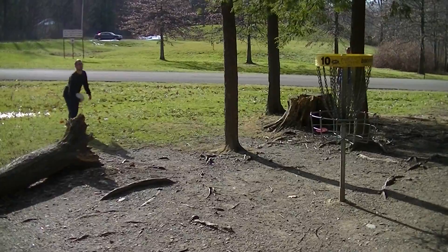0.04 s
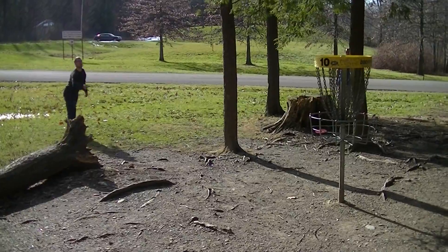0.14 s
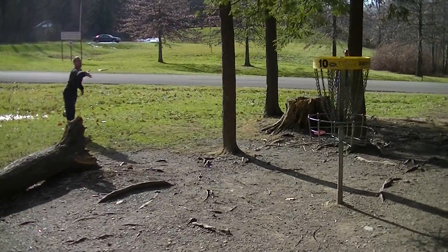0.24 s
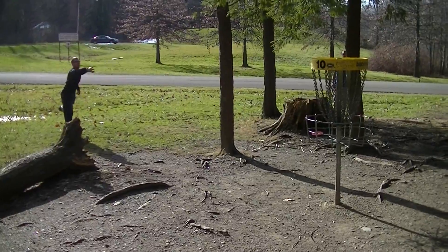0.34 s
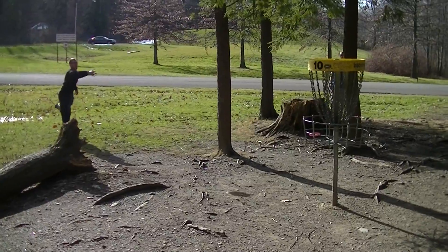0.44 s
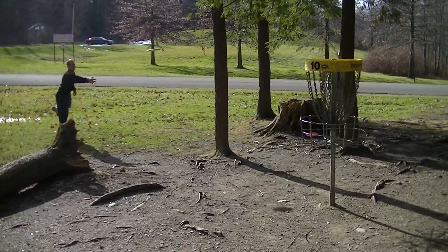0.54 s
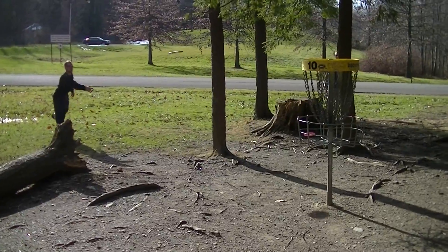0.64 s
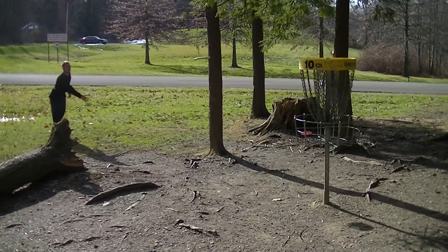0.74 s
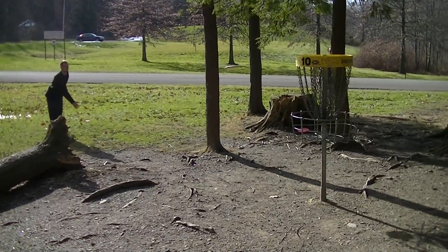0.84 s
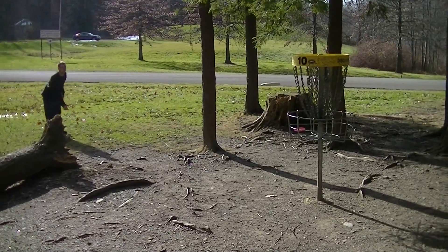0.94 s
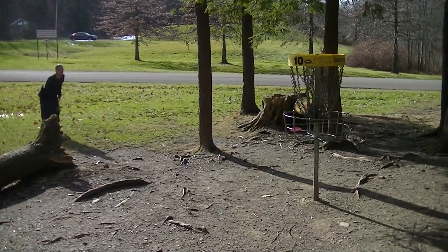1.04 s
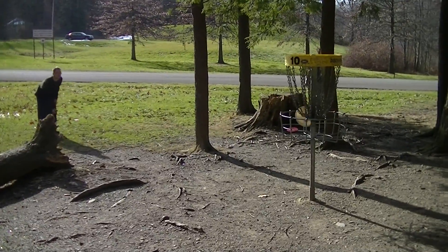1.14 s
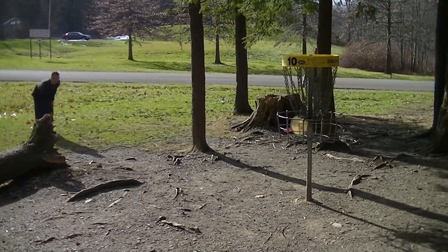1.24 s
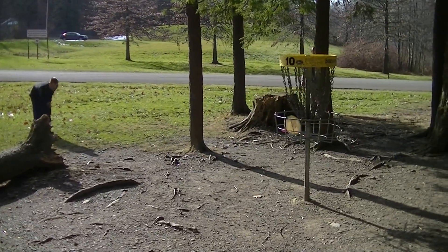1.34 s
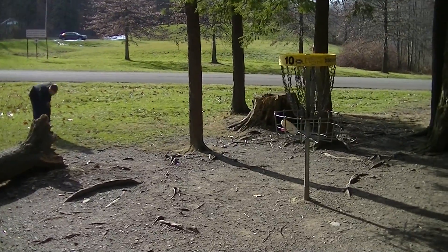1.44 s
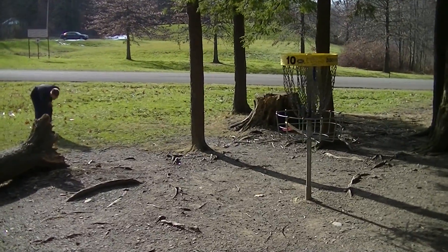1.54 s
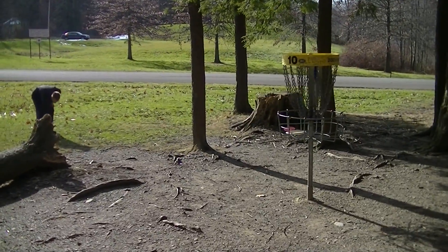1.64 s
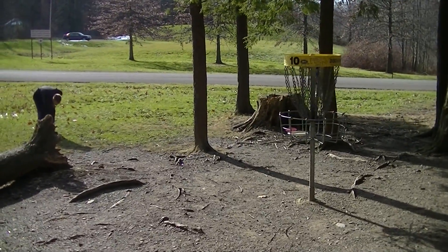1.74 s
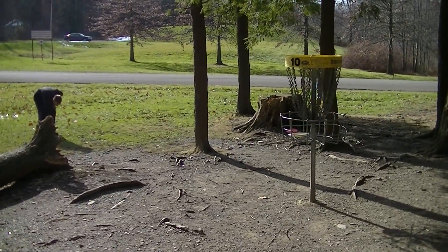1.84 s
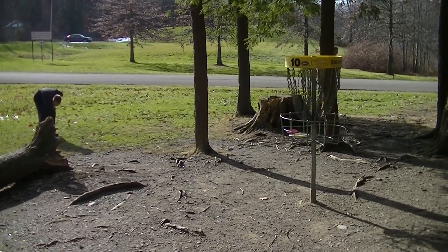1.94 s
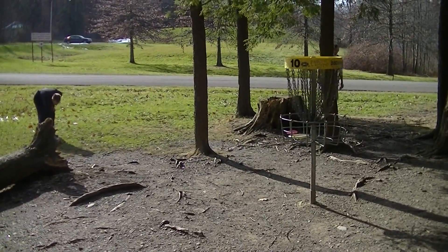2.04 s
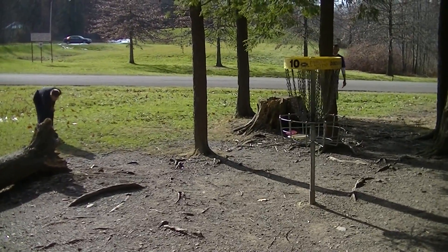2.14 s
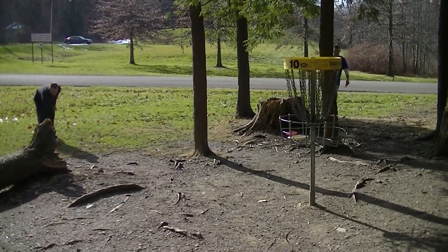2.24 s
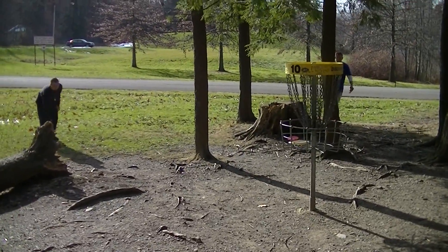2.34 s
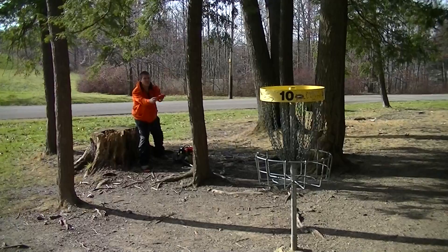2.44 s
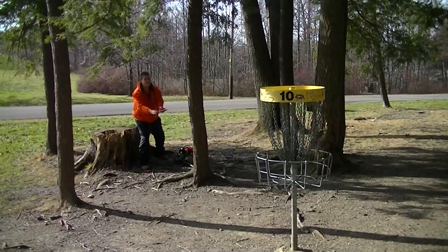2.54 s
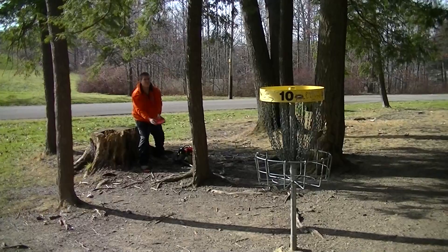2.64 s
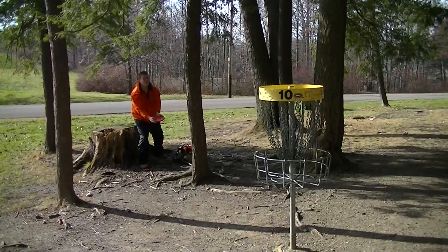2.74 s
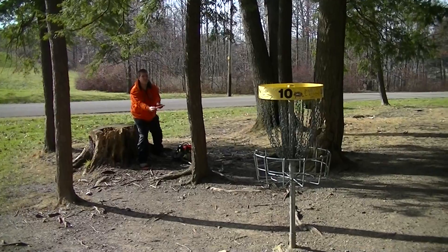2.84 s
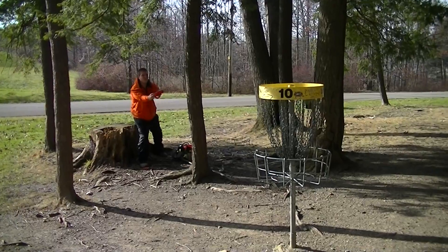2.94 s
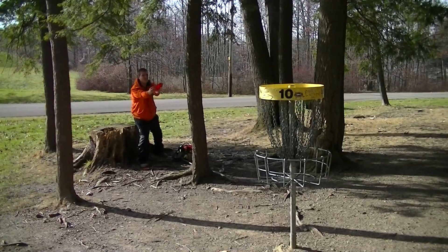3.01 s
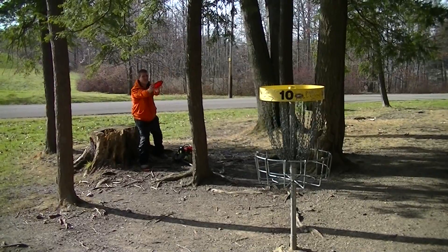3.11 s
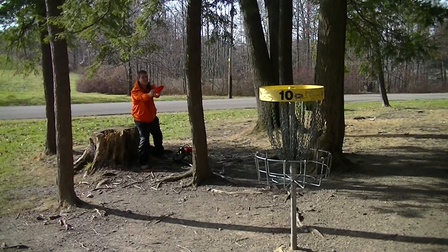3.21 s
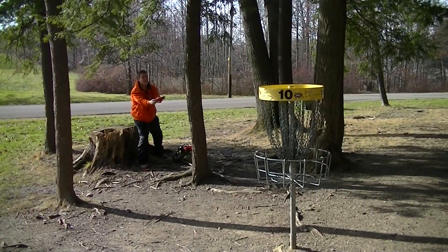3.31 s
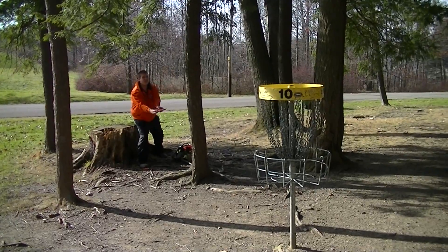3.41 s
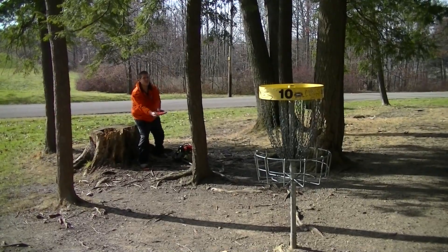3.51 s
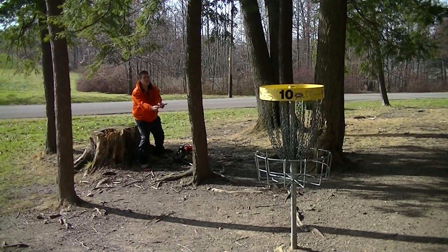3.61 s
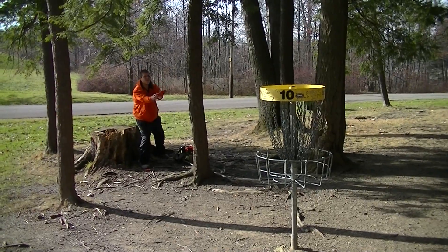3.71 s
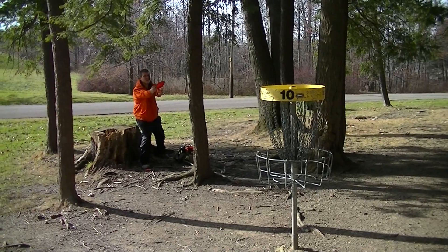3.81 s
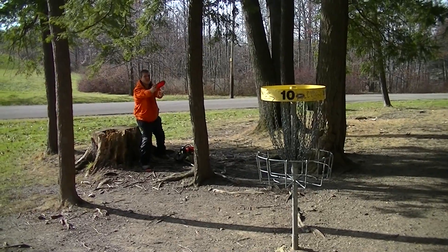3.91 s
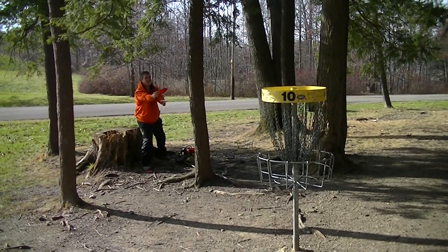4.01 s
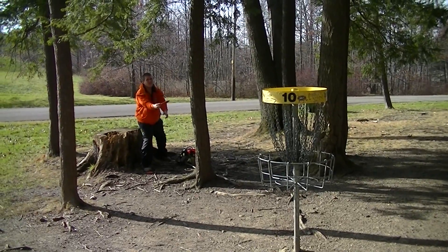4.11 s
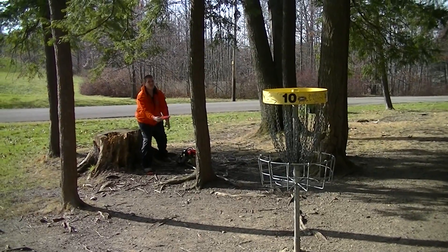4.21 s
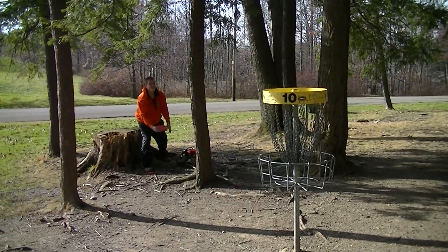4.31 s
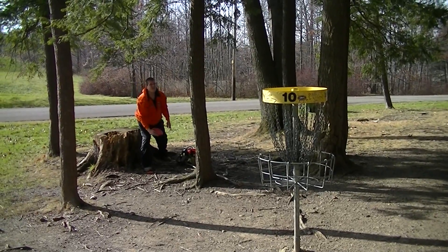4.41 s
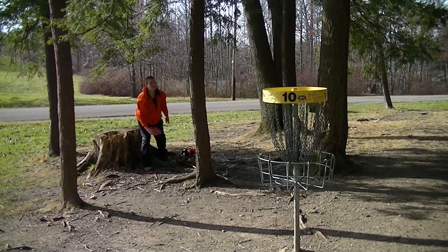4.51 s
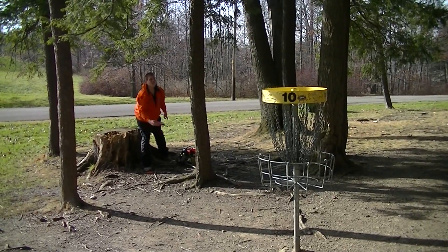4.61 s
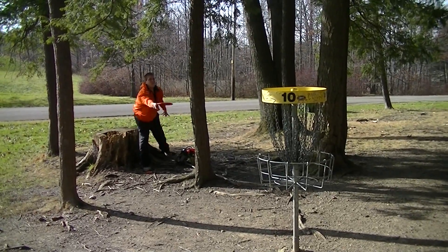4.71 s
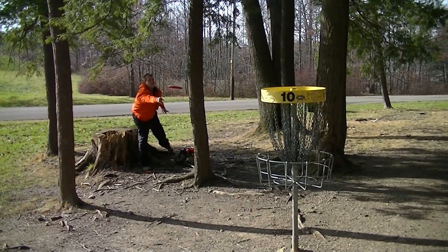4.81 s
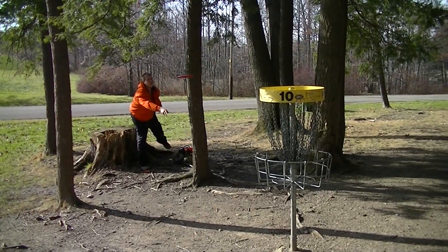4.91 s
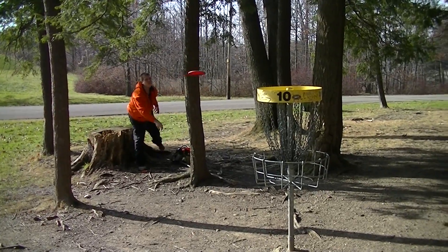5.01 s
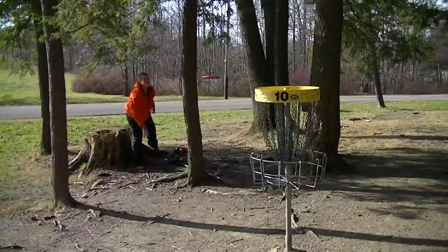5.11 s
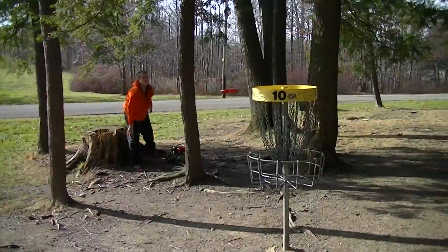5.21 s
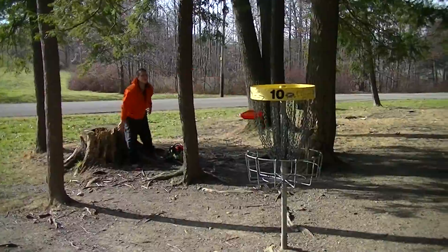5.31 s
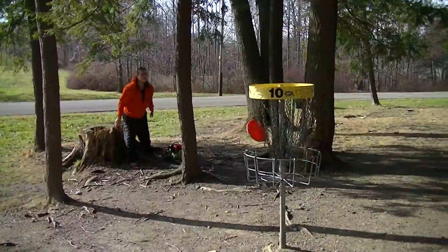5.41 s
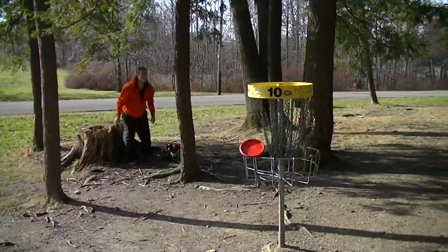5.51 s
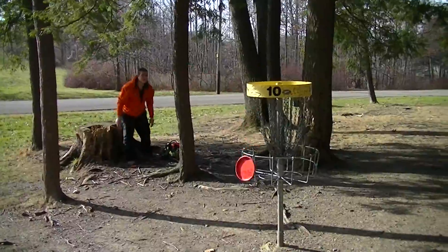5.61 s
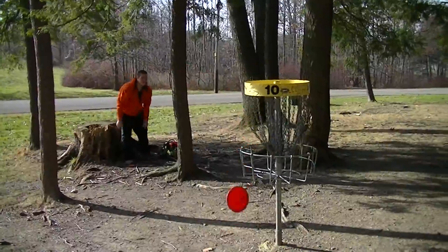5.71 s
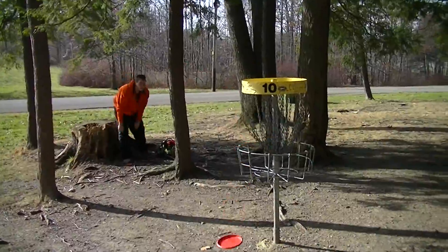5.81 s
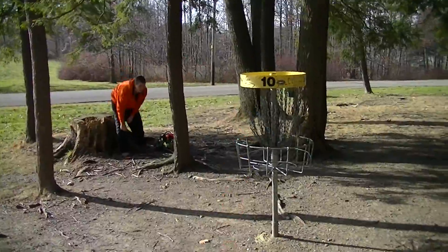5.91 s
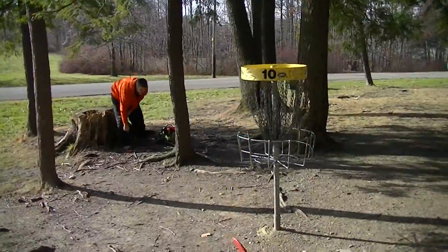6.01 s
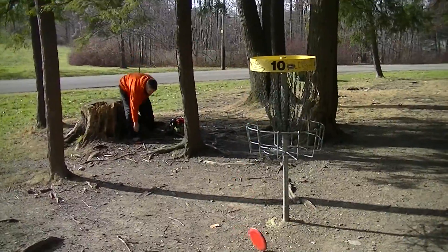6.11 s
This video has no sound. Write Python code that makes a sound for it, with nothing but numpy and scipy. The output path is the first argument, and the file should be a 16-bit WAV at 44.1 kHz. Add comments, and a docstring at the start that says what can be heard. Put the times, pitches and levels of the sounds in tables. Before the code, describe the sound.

Two disc golf throws hit the basket outdoors, each a plastic knock and a clash of steel chains that jingle and fade.

```python
"""Disc golf chains in a park

A thrown disc crashes into the chains of a basket; the sound cuts off, and a second throw follows.
Steel links jingle near 12 kHz and clatter, the hoop that gathers them rings near 4 kHz, the plastic
disc scrapes and knocks, and the tray wires ring. Trees echo it all. Around it are far road noise,
light wind on the microphone, rustling clothes, a few dry snaps and a faint trill."""
import sys
import numpy as np
from scipy import signal
from scipy.fft import rfft, irfft, next_fast_len
from scipy.io import wavfile
from scipy.ndimage import uniform_filter1d

SR = 44100
rng = np.random.default_rng(int(sys.argv[2]) if len(sys.argv) > 2 else 0)


def inscribe(sig):
    """Save sig as 16-bit PCM at rate SR to the path in sys.argv[1].

    A 1-D sig is mono; a 2-D sig holds one channel per row.
    Samples are clipped to [-1, 1] before scaling.
    """
    pcm = np.round(np.clip(np.atleast_2d(sig).T, -1, 1) * 32767)
    wavfile.write(sys.argv[1], SR, pcm.astype(np.int16))


N = 271259
T = np.arange(N) / SR
CUT_S, DIP_S = 2.406, .005  # the first throw stops here, and the level dips this long

# In all tables, levels are relative and fade_s is the time to die away by 60 dB.
# Chains slapping together: start_s, tick_db, ring_db
SLAPS = [(1.0076, 0.5, -13), (1.0548, -2, -11), (1.076, -17, -19), (1.0944, -27, -16), (1.1328, -18, -15),
         (1.1787, -15, -13), (1.243, -17, -7), (1.345, -18, -15), (1.3648, -32, -3.5), (1.4127, -28, -7),
         (1.4562, -14, -6), (1.6382, -21, -20), (1.682, -28, -11), (1.7454, -25, -17), (1.7846, -17.5, -20),
         (1.8102, -16.5, -24), (1.852, -20.5, -10), (1.8855, -33, -10), (1.922, -39, -7),
         (1.9334, -38, -18.5), (2.0063, -27, -25), (2.0836, -33, -28), (2.141, -40, -23),
         (2.3754, -44, -25), (5.3011, 0.5, -4), (5.3194, -4, -2), (5.3676, -6.5, -14), (5.3939, -9, -7),
         (5.4115, -23, -11), (5.4414, -28, -11), (5.456, -11.5, -2.5), (5.5717, -13, -5),
         (5.5947, -12, -27), (5.6795, -28, -15), (5.7038, -23, -17), (5.7169, -15, -11),
         (5.7458, -13, -4.5), (5.8046, -20, -8), (5.8344, -32, -15), (5.879, -16.5, -23), (5.949, -19, -19),
         (5.9693, -44, -6), (6.0437, -42, -14), (6.092, -39, -26), (6.11, -40, -22), (6.124, -24.5, -18)]


def gain_of(db):
    """Turns decibels into a multiplier."""
    return 10 ** (np.asarray(db) / 20)


def evened(x):
    """Scales x to an average (rms) level of 1."""
    return x / np.sqrt(np.mean(x ** 2) + 1e-20)


def curve_at(points, hz):
    """Reads between the rows of a (pitch_hz, value) table."""
    pitches, values = np.transpose(points)
    return np.interp(np.log(hz + 1), np.log(pitches + 1), values)


def coloured(x, spectrum):
    """Filters x by a (pitch_hz, level_db) table."""
    size = next_fast_len(len(x))
    gains = gain_of(curve_at(spectrum, np.fft.rfftfreq(size, 1 / SR)))
    return irfft(rfft(x, size) * gains, size)[:len(x)]


def evened_in_band(x, low_hz, high_hz):
    """Scales all of x so that one band has an average level of 1."""
    band = signal.sosfilt(signal.butter(4, [low_hz, high_hz], "band", fs=SR, output="sos"), x)
    return x / np.sqrt(np.mean(band ** 2))


def ring(x, hz, fade_s):
    """Each click in x starts a dying tone."""
    decay, turn = 1000 ** (-1 / (max(fade_s, 1e-3) * SR)), 2 * np.pi * hz / SR
    return signal.lfilter([0, np.sin(turn)], [1, -2 * decay * np.cos(turn), decay * decay], x)


def clicks(per_s, spread_db):
    """Random contacts of either sign, mostly small."""
    when, size, sign = rng.random((3, N))
    return (when < per_s / SR) * gain_of(-spread_db * np.log(size + .01)) * np.sign(sign - .5)


def blows(rows, shape, column):
    """Places a loudness shape at each row's start, at the level in the given column."""
    out = np.zeros(N)
    for row in rows:
        out[round(row[0] * SR)] = gain_of(row[column])
    return signal.oaconvolve(out, shape)[:N]


def bursts(rows, rise_s=.007, column=1):
    """Loudness of events that rise fast and fade; those begun before CUT_S stop there."""
    out = np.zeros(N)
    for row in rows:
        start, stop = round(row[0] * SR), round(CUT_S * SR) if row[0] < CUT_S else N
        t = T[:stop - start]
        level_db = row[column] - 60 * np.maximum(t - rise_s, 0) / row[-1]
        out[start:stop] += np.minimum(t / rise_s, 1) * gain_of(level_db)
    return out


def smeared(x, fade_s):
    """Spreads x into a short, fading trail of randomly delayed copies."""
    t = T[:SR // 2]
    trail = rng.choice([-1., 1.], len(t)) * (rng.random(len(t)) < .05)
    trail *= gain_of(-60 * t / fade_s) * (t > .002)
    return signal.fftconvolve(x, trail / np.linalg.norm(trail))[:N]


def road():
    """Far traffic: low noise with drifting louder patches, nearly alike left and right."""
    # Road tone, one list for each throw: pitch_hz, level_db
    tones = [
        [(41, -36), (70, 0.5), (129, -5), (208, 1), (238, -1.5), (286, -11.5), (401, -11.5), (603, -12),
         (723, -5), (908, -9.5), (1560, -15), (2580, -23), (7140, -30.5), (14400, -40.5), (15800, -53)],
        [(41, -33), (70, -9.5), (155, -1), (186, -10.5), (222, 1.5), (342, -11), (383, -5), (420, -15.5),
         (449, -13.5), (707, -5), (1040, -10), (1400, -9), (2050, -16.5), (8570, -29), (15800, -40)],
    ]
    # Road loudness, one list for each throw: time_s, level_db
    levels = [
        [(0.0, -43.5), (1.5, -44), (2.4, -42.5)],
        [(2.42, -48), (4.1, -48), (5.4, -46), (6.15, -43.5)],
    ]
    # How alike left and right are: pitch_hz, likeness (1 = the same)
    likeness = [(60, 0.87), (150, 1), (380, 0.96), (950, 0.99), (2380, 0.94), (5980, 0.9), (15000, 1)]
    frames, hz = N // 256 + 5, np.fft.rfftfreq(1024, 1 / SR)
    a, b, c, d, patches = rng.standard_normal((frames, 513, 5)).T
    patches = evened(uniform_filter1d(uniform_filter1d(patches, 12, 0), 14, 1))
    same = np.clip(curve_at(likeness, hz), -1, 1)[:, None]
    left = a + 1j * b
    right = same * left + np.sqrt(1 - same ** 2) * (c + 1j * d)
    noise = np.array([left, right]) * gain_of(0.73 * patches)
    out, first = 0, T < CUT_S + DIP_S / 2
    for tone, rows, heard in zip(tones, levels, (first, ~first)):
        spectra = noise * gain_of(curve_at(tone, hz))[:, None]
        wash = signal.istft(spectra, nperseg=1024, noverlap=768)[1][:, :N]
        out += heard * gain_of(np.interp(T, *np.transpose(rows))) * evened_in_band(wash, 78, 400)
    return out


def wind():
    """Puffs of air rumble on the microphone, partly different left and right."""
    # Puffs of wind: middle_s, level_db, half_length_s
    gusts = [(.17, -43, .08), (1.75, -50, 0.3), (2.24, -46, 0.071), (2.45, -58, .08), (3.03, -51.5, .1),
             (3.58, -46.5, .09), (4.02, -54, 0.095), (4.559, -49.5, .06), (4.92, -42, .08)]
    lull_db, tone = -69, [(8, -19), (25, 0), (55, 5), (90, -0.5), (200, -47.5)]
    a, b = (coloured(rng.standard_normal(N), tone) for _ in range(2))
    puffs = sum(gain_of(db) * np.exp(-((T - s) / half_s) ** 2) for s, db, half_s in gusts)
    return (gain_of(lull_db) + puffs) * evened(np.array([a + 0.86 * b, a - 0.29 * b]))


def clothes():
    """The thrower's clothes give a soft hiss of fine grains."""
    # Rustles of cloth: start_s, level_db, fade_s
    rustles = [(.38, -46.5, .7), (.6, -60, .5), (.9, -53, .25)]
    tone = [(700, -21), (2000, 1), (5000, -1.5), (11000, -10.5), (14000, -29.5)]
    cloth = coloured(clicks(per_s=10000, spread_db=4.3), tone)
    return bursts(rustles, rise_s=.045) * evened_in_band(cloth, 2500, 11000)


def chain_jingle(count=14):
    """Links, each tuned a little apart, are tapped as they swing and shaken at each slap."""
    # A link's tones in low, middle and high groups: pitch_hz, spread_hz, level_db, fade_s
    groups = [
        [(9270, 1500, -11, 0.0055), (9900, 150, -24, 0.06), (11754, 80, 0, 0.13)],
        [(12130, 90, -13, .08), (12440, 90, -2, 0.17), (12740, 100, -2, 0.15)],
        [(13700, 290, -5.5, 0.11), (13500, 130, -3, .1), (14300, 120, -18, .08)],
    ]
    # Chain bundles swinging into each other: start_s, low_group_db, middle_group_db, fade_s
    swings = [(1.003, -22, -15, 0.65), (1.038, -17.5, -20, 1.13), (1.12, -19, -33, 0.34),
              (1.238, -21, -33, 0.12), (1.338, -41, -23, .2), (1.355, -21.5, -27, 0.47),
              (1.47, -24, -24, 0.53), (1.585, -29, -34, 2.6), (1.73, -31, -21.5, 0.15),
              (1.845, -24, -32, 0.49), (2.08, -32.5, -40, 1.04), (2.338, -46, -39, .06),
              (2.378, -32.5, -32.5, .15), (5.298, -23, -18.5, .6), (5.358, -9, -15, 0.17),
              (5.385, -21, -14, 0.11), (5.408, -15, -15.5, 1.1), (5.63, -40, -38, 2.5),
              (5.824, -34, -9.5, 0.086), (5.88, -47, -31, 0.097), (5.952, -21, -23, 0.43)]
    taps, which_link = clicks(per_s=380, spread_db=3.1), rng.integers(0, count, N)
    slap_shape = T[:2000] / 0.0029 * gain_of(-60 * T[:2000] / 0.023)
    shakes = blows(SLAPS, slap_shape, column=2) * rng.standard_normal(N)
    low, middle = (bursts(swings, rise_s=.0092, column=k) for k in (1, 2))
    high = gain_of(-9) * middle
    out = np.zeros(N)
    # Other links face the microphone on each throw.
    for throw in (slice(SR * 7 // 8, SR * 5 // 2), slice(SR * 5, N)):
        for tones, level, slap_db in zip(groups, (low, middle, high), (-24, -28, -36)):
            jingle, struck = 0, 0
            for hz, spread_hz, db, fade_s in tones:
                for k, offset in enumerate(rng.uniform(-1.61, 1.64, count)):
                    mine, link_hz = which_link[throw] == k, hz + spread_hz * offset
                    jingle += gain_of(db) * ring(taps[throw] * mine, link_hz, fade_s)
                    struck += gain_of(db) * ring(shakes[throw] * mine, link_hz, 0.26 * fade_s)
            out[throw] += level[throw] * evened(jingle) + gain_of(slap_db) * struck
    return out


def chain_clatter(count=16):
    """Steel hits steel: a dense patter, scattered short pings and a tick at each slap."""
    # Tone of steel contacts: pitch_hz, level_db
    tone = [(2120, -24.5), (3600, -20), (4010, -21), (4240, -13), (5090, -11), (5850, -11.5), (8870, -13.5),
            (11000, -13.5), (14300, -44.5), (22000, -120)]
    # Flurries of contacts: start_s, level_db, fade_s
    rattles = [(1.003, -15, 0.27), (1.09, -30.5, 1.46), (1.452, -32.5, 0.3), (1.632, -46, 0.4),
               (1.74, -57, 0.13), (1.778, -41, 0.31), (2.005, -43, 0.079), (2.08, -52, 1.1),
               (5.3, -15, .22), (5.363, -33.5, 1.5), (5.57, -35.5, .4), (5.741, -29, 0.37),
               (5.874, -38, 0.13), (5.945, -54, 0.49)]
    patter = evened_in_band(coloured(clicks(per_s=1800, spread_db=2.36), tone), 5000, 9500)
    taps, which_ping = clicks(per_s=350, spread_db=4.5), rng.integers(0, count, N)
    pitches_hz = np.linspace(5200, 11200, count)
    pings = evened(sum(ring(taps * (which_ping == k), hz, .012) for k, hz in enumerate(pitches_hz)))
    hiss = evened_in_band(coloured(rng.standard_normal(N), tone), 5000, 12000)
    ticks = blows(SLAPS, gain_of(-60 * T[:3000] / 0.044), column=1) * hiss
    return bursts(rattles) * (patter + gain_of(-5.5) * pings) + gain_of(-11.5) * ticks


def disc_scrape():
    """Plastic drags along the chains in thousands of tiny clicks."""
    # Drags of the disc: start_s, level_db, fade_s
    drags = [(1.003, -19.5, 0.18), (1.048, -20, 0.044), (1.13, -35, 0.88), (1.205, -30, 0.42),
             (1.41, -33.5, .6), (1.455, -45, 0.27), (1.632, -38, 0.14), (1.7, -45.5, 1.17),
             (5.3, -17.5, 0.31), (5.34, -21.5, 0.1), (5.39, -42, 1.5), (5.505, -35, 0.25),
             (5.561, -35.5, 0.52), (5.745, -45, .5), (5.868, -33.5, 0.15), (5.897, -45, 0.11),
             (5.943, -51, 1.4)]
    # Tone of the scraping: pitch_hz, level_db
    tone = [(180, -40), (300, -11.5), (443, -12.5), (714, -6.5), (1230, -4.5), (1980, 0), (2430, -5.5),
            (4000, -9.5), (5200, -50.5), (8800, -120)]
    grains = coloured(clicks(per_s=4000, spread_db=2.7), tone)
    return bursts(drags) * evened_in_band(grains, 600, 3600)


def disc_knocks():
    """The disc hits steel or ground: a crack, then dull tones, weaker far from the struck spot."""
    # Knocks: start_s, level_db, spot (0 = centre, 1 = rim)
    knocks = [(1.004, -11, 0.92), (1.011, -19, 0.087), (1.033, -15, 0.91), (1.045, -17, 0.45),
              (1.057, -13, 0.27), (1.068, -23, .1), (1.093, -25, 0.81), (1.115, -24, 0.25),
              (1.158, -25, .55), (1.174, -23, .9), (1.21, -20.5, 0.17), (1.236, -22, 0.97),
              (1.412, -28, 0.33), (1.457, -21.5, 1), (1.638, -28.5, 0.22), (2.082, -34.5, .55),
              (2.269, -35, .45), (5.301, -13.5, .7), (5.305, -15, 0.2), (5.314, -22, .75),
              (5.325, -13, .75), (5.341, -10.5, 0.75), (5.347, -8, 0.5), (5.364, -11.5, 0.37),
              (5.374, -20, 0.57), (5.397, -22, .45), (5.414, -28, 0.11), (5.503, -15, 0.32),
              (5.564, -20, .95), (5.881, -14.5, .15), (5.899, -25.5, 0.086)]
    # The disc's tones in hollow, middle and rim groups: pitch_hz
    groups = [
        [713, 790, 870],
        [1200, 1712, 1950],
        [2600, 3250],
    ]
    away_db, fade_at_1khz_s, crack_db, crack_fade_s = -15, .032, -4, .008
    out, t = np.zeros(N), T[:3000]
    for (s, db, spot), draws in zip(knocks, rng.random((len(knocks), 8, 2))):
        tones = [(hz, away_db * abs(k / 2 - spot)) for k, group in enumerate(groups) for hz in group]
        knock = ring(rng.standard_normal(len(t)), 2400, .0012) * gain_of(crack_db - 60 * t / crack_fade_s)
        for (hz, tone_db), (bend, phase) in zip(tones, draws):
            bent_hz = hz * (1 + (bend - .5) / 10)  # flexing shifts the pitch a little
            level = gain_of(tone_db - 60 * t / fade_at_1khz_s * np.sqrt(hz / 1000))
            knock += level * np.sin(2 * np.pi * (bent_hz * t + phase))
        out[round(s * SR):][:len(t)] += gain_of(db) * knock * np.clip(t / 0.00083, 0, 1)
    return out


def disc_thuds():
    """The whole disc flexes with a low tone on the hardest blows and on landing."""
    # Thuds: start_s, level_db, pitch_hz, fade_s
    thuds = [(1.012, -24.5, 600, .04), (1.057, -20.5, 579, .04), (5.308, -27, 367, .05),
             (5.345, -21, 367, 0.049), (5.365, -24, 304, 0.043), (5.504, -22.5, 335, 0.047),
             (5.885, -15.5, 310, 0.059), (5.882, -29.5, 140, 0.051)]
    out, t = np.zeros(N), T[:3000]
    for s, db, hz, fade_s in thuds:
        level = gain_of(db - 60 * t / fade_s) * np.clip(t / 0.0019, 0, 1)
        out[round(s * SR):][:len(t)] += level * np.sin(2 * np.pi * hz * t)
    return out


def hoop():
    """Each chain strike stops the hoop's old ringing and starts it anew."""
    # Chains striking the hoop: start_s, long_tones_db, short_tones_db
    strikes = [(1.0162, -15, -11), (1.053, -9, -9), (1.0736, -7.5, -13), (1.11, -41, -12),
               (1.136, -16.5, -14.5), (1.1835, -20.5, -21), (1.221, -30, -23), (1.246, -19.5, -20),
               (1.3075, -25.5, -33), (1.3583, -20.5, -25), (1.4007, -19.5, -22), (1.4603, -22, -12),
               (1.499, -23.5, -38), (1.5476, -31, -29.5), (1.6382, -42, -32), (1.7827, -12, -17),
               (1.808, -12, -15.5), (1.851, -25, -24), (1.932, -29.5, -24.5), (2.007, -37, -29),
               (2.084, -42, -43), (5.3223, -19, -28), (5.385, -29, -18), (5.4415, -21, -19),
               (5.457, -23, -18), (5.493, -23, -27), (5.5699, -18, -15), (5.6, -22, -18),
               (5.704, -38, -22.5), (5.7172, -25, -21), (5.8047, -27, -26), (5.8444, -28, -37),
               (5.8899, -31, -27), (5.9027, -30, -39), (5.99, -37.5, -52)]
    # The hoop's long tones: pitch_hz, level_db, fade_s
    long_tones = [(2280, -23.5, 0.08), (3270, -27, 0.2), (4232, -4.5, 0.48), (4284, -5, 0.39)]
    # Its short tones: pitch_hz, level_db, fade_s
    short_tones = [(4350, 4, 0.068), (4530, -4.5, 0.071), (4600, -8, 0.0505), (4800, -5, 0.05),
                   (5760, -14.5, 0.1), (6550, -21, .08)]
    scatter = .03  # each chain hits a different spot, which shifts the short tones' pitch
    out, t = np.zeros(N), T[:SR // 2]
    luck = rng.random((len(strikes), len(long_tones + short_tones), 3))
    stops_s = [row[0] for row in strikes[1:]] + [N / SR]
    for (s, long_db, short_db), stop_s, draws in zip(strikes, stops_s, luck):
        tones = [(hz, long_db + db, fade_s) for hz, db, fade_s in long_tones]
        for (hz, db, fade_s), shift in zip(short_tones, draws[:, 2]):
            tones.append((hz * (1 + scatter * (shift - .5)), short_db + db, fade_s))
        ringing = 0
        for (hz, db, fade_s), (strength, phase, _) in zip(tones, draws):
            level = gain_of(db + 3.4 * (strength - 1.5) - 60 * t / fade_s)
            cycles = hz * (t + s) + 0.28 * phase  # mostly in step with the last strike
            ringing += level * np.sin(2 * np.pi * cycles)
        held = np.clip(t / .0015, 0, 1) * gain_of(-60 * np.maximum(t + s - stop_s, 0) / 0.028)
        part = out[round(s * SR):][:len(t)]
        part += gain_of(-2) * (ringing * held)[:len(part)]
    return out


def tray():
    """Disc and chains brush the tray; each small tap rings one wire."""
    # Brushes against the tray: start_s, level_db, fade_s
    brushes = [(1.055, -43, 0.18), (1.08, -42, 1), (1.452, -40, 0.42), (1.803, -46.5, 0.2),
               (5.375, -39, 0.2), (5.445, -44, .4), (5.72, -45.5, 0.94), (5.748, -36, 0.26)]
    # Tones of the wires: pitch_hz, level_db, fade_s
    wires = [(1220, -16, .15), (1300, -11.5, 0.1), (1594, -12, 0.121), (1734, -0.5, 0.16), (2050, -9.5, .1),
             (2280, 0.5, .1), (2860, -0.5, .12), (3100, -2, .08), (3220, 5, 0.075), (3270, 5, 0.08),
             (3470, -5, .09), (4120, -8, 0.082)]
    taps = bursts(brushes) * clicks(per_s=1200, spread_db=2.5)
    which_wire = rng.integers(0, len(wires), N)
    return sum(gain_of(db) * ring(taps * (which_wire == k), hz, fade_s)
               for k, (hz, db, fade_s) in enumerate(wires))


def snaps():
    """Dry snaps close by: a few milliseconds of crackle, brightest around one pitch."""
    # Snaps: start_s, level_db, pitch_hz, body_db
    events = [(2.2133, -18.5, 2650, -10), (2.2277, -14.5, 2480, -16), (2.3437, -4, 5240, -0.5),
              (2.391, -15, 5290, -1), (2.6775, -41, 3180, 1), (3.1572, -33, 3880, -1),
              (3.4078, -36.5, 3800, -5)]
    out = np.zeros(N)
    for s, db, hz, body_db in events:
        crack = np.diff(rng.standard_normal(1024) * gain_of(-60 * T[:1024] / 0.01), prepend=0)
        thin, body = ring(crack, hz, .002), ring(crack, 2150, .001)
        snap = evened(thin) + gain_of(body_db) * evened(body) + 0.29 * evened(crack)
        out[round(s * SR):][:1024] += gain_of(db) * snap / abs(snap).max()
    return coloured(out, [(500, -20), (1700, 0.5)])


def trill():
    """A faint, regular run of short chirps on two pitches, far off."""
    # The low and the high note: pitch_hz
    notes_hz = [3850, 4800]
    tune = "llhlhllhlhlhhlhllhlhl"  # l = low, h = high
    start_s, step_s, half_length_s = 2.43, .03337, .004
    out = np.zeros(N)
    for k, note in enumerate(tune):
        high = note == "h"
        level = gain_of(-49 - 5 * high - 5.5 * rng.random())
        swell = np.exp(-((T - start_s - k * step_s) / half_length_s) ** 2)
        out += level * swell * np.sin(2 * np.pi * notes_hz[high] * T)
    return out


def scene():
    """Two throws and their echoes over the sounds of the park, in stereo."""
    # How the microphone colours the chains and snaps: pitch_hz, level_db
    microphone_tone = [(60, -25.5), (500, 6), (13500, -2), (14500, -5), (15200, -21), (16000, -27.5)]
    # Tone of a faint left-right difference that widens the sound: pitch_hz, level_db
    stereo_width = [(60, -12.5), (99, -19), (160, -25), (270, -24.5), (450, -25), (740, -35), (1220, -43.5),
                    (2010, -44.5), (3330, -23.5), (5500, -34), (9080, -43.5), (15000, -31)]
    disc_tone = [(80, -60), (250, -30), (480, 0), (16000, -1.5)]  # so small a plate gives off no bass
    ringing = hoop()
    near = coloured(chain_jingle() + chain_clatter() + snaps(), microphone_tone) + ringing + tray()
    near += coloured(disc_scrape() + disc_knocks(), disc_tone) + disc_thuds() + clothes()
    out = road() + wind() + trill()
    for heard in (T < CUT_S, T >= CUT_S):  # the first throw's echoes stop with it
        throw = near * heard
        side = coloured(smeared(throw, fade_s=.026), stereo_width)
        side += gain_of(-19) * np.roll(ringing, 3)  # a slightly shifted copy of the hoop's ringing adds to the left-right difference
        centre = throw + gain_of(-15.5) * smeared(throw, fade_s=.036)  # echoes from trunks and ground
        out += np.array([centre + side, centre - side]) * heard
    return out


def record(dry):
    """The level dips briefly after the first throw, peaks are rounded and the top treble is removed."""
    dip = 1 - .75 * uniform_filter1d(1. * (T > CUT_S) * (T < CUT_S + DIP_S), 20)
    rounded = 1.253 * np.tanh(dry * dip / 1.204)
    low_pass = signal.firwin(511, cutoff=15900, window=("kaiser", 9), fs=SR)
    return signal.oaconvolve(rounded, low_pass[None], "same")


dry = scene()
out = record(dry)
inscribe(out)
```